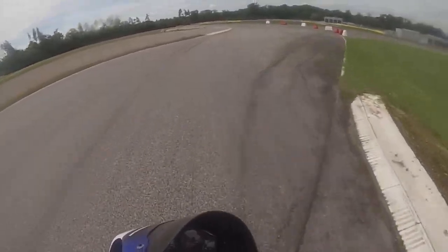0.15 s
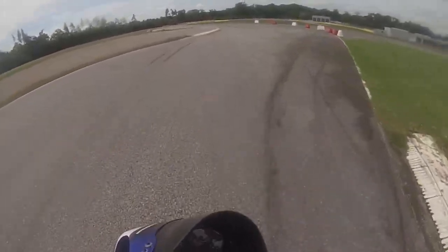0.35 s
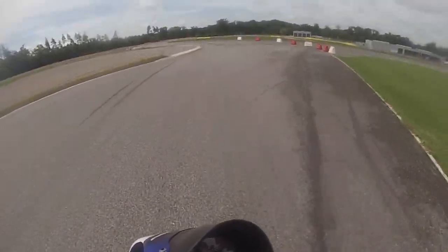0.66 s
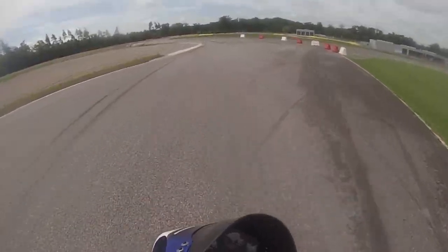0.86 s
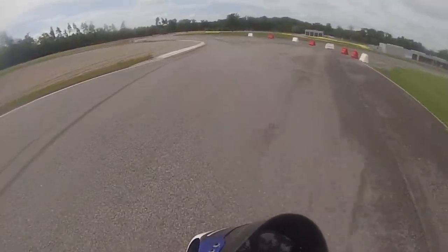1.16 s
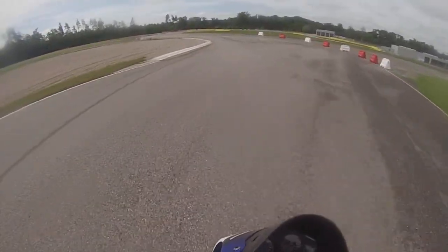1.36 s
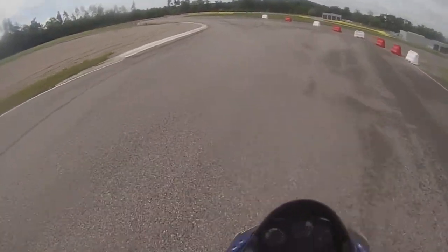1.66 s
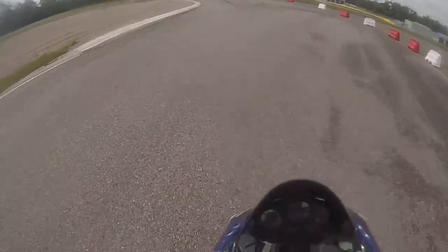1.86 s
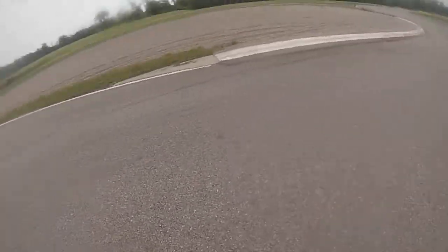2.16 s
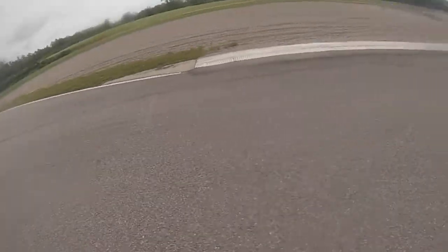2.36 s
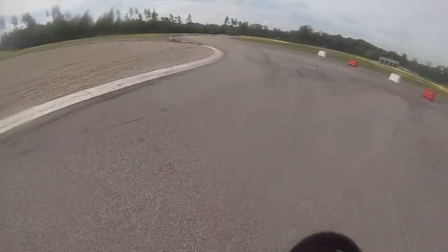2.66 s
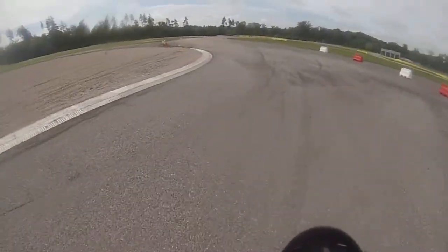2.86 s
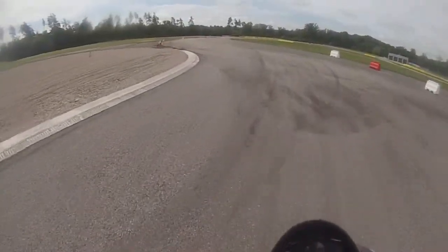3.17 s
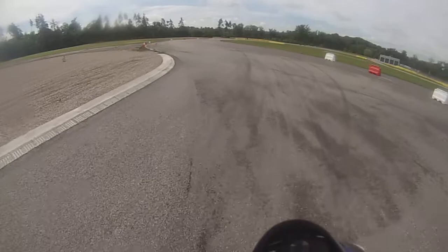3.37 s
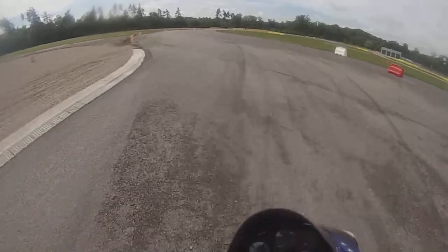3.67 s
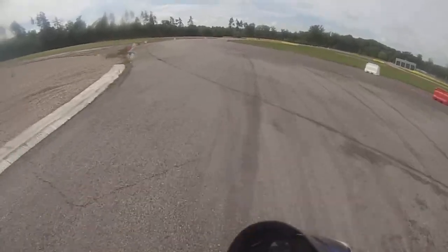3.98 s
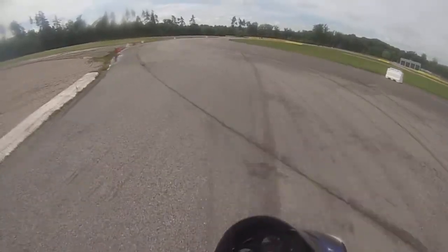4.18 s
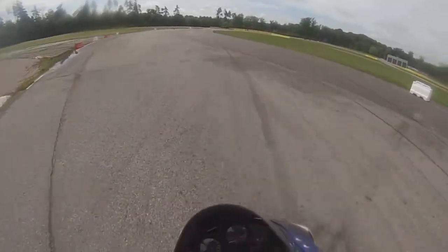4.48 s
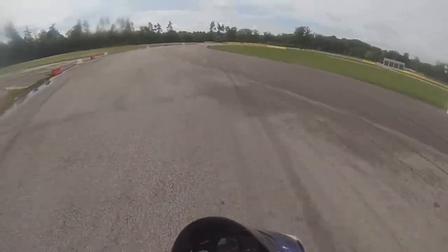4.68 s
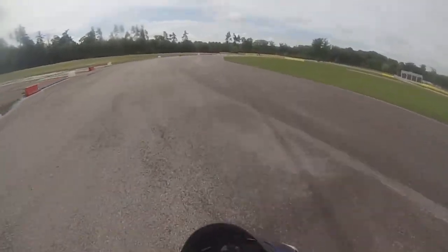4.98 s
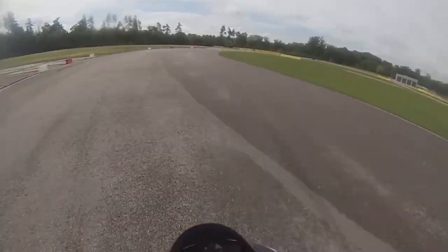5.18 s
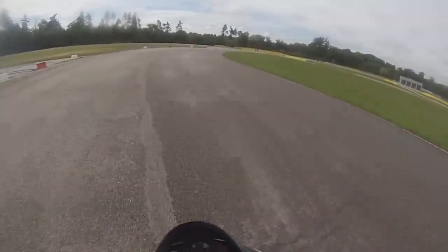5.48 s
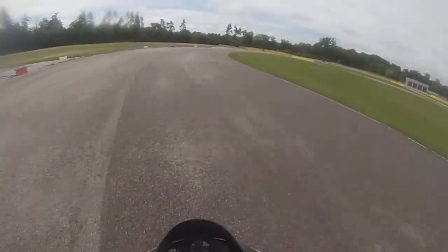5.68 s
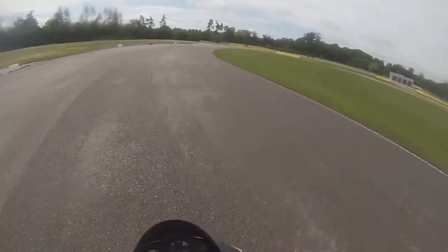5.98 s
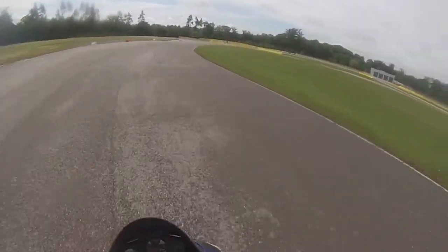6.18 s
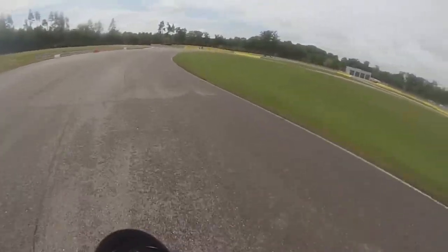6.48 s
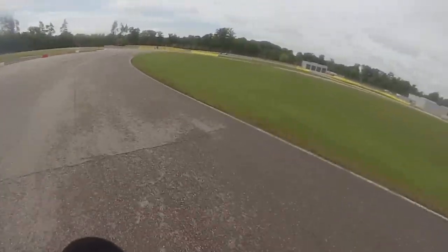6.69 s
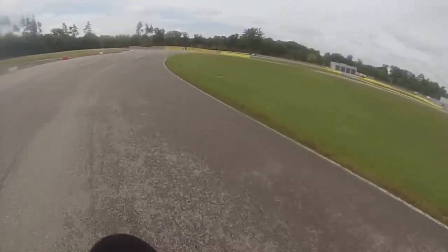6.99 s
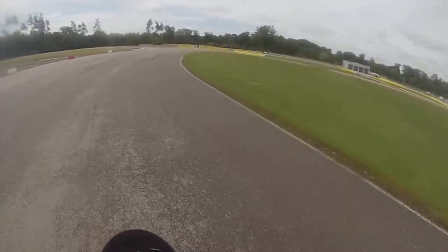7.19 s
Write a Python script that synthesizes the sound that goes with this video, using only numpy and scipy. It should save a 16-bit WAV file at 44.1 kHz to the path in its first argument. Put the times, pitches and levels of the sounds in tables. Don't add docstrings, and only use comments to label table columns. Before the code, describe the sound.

A microphone sealed in a camera case on a motorcycle rider's helmet catches mostly wind as the bike speeds round an open track. From 0 to 2 seconds there is a moderate hollow rush with fine hiss, soft low flutter and a faint blurred engine drone; the rush lifts a little near 1.6. Around 2.2 to 2.5 the rush drops back while heavy bass thumps hit the mount, and a very short falling swish passes at 2.5. From 3 seconds the wind builds, with irregular low knocks around 3.7 and 4.2, reaching its fullest roar near 5. The low, rough engine drone surges unevenly between about 4.5 and 6.6. After that the rush gradually eases, though deep buffeting stays strong. At about 6.8 a brief, breathy high whistle rises slightly and falls, and the wind continues to the end at 7.3.

```python
import sys
import numpy as np
from scipy import signal
from scipy.fft import rfft, irfft, next_fast_len
from scipy.io import wavfile
from scipy.ndimage import uniform_filter1d, map_coordinates

SR = 44100
rng = np.random.default_rng(int(sys.argv[2]) if len(sys.argv) > 2 else 0)


def makeup_ratio(level_db):
    decades = np.asarray(level_db, float) / 20
    return 10 ** decades


def wav_out(sig):
    wavfile.write(sys.argv[1], SR, np.round(np.clip(np.atleast_2d(sig).T, -1, 1) * 32767).astype(np.int16))


N = 323694
TIME_S = np.arange(N) / SR


def unit(x):
    return x / np.sqrt(np.mean(x ** 2) + 1e-20)


def curves(rows):
    times_s, *columns = np.transpose(rows)
    return [np.interp(TIME_S, times_s, column) for column in columns]


def wobble(rate):
    points = rng.standard_normal(int(N * rate / SR) + 4)
    return map_coordinates(points, [np.arange(N) * rate / SR])


def bump(centre_s, length_s):
    return np.exp(-3 * ((TIME_S - centre_s) / length_s) ** 2)


def slope(points):
    table_hz, db = np.transpose(points)
    return lambda hz: makeup_ratio(np.interp(np.log(hz + 1), np.log(table_hz), db, left=-120, right=-120))


def cavity(modes, steep):
    wall_hz = 7900

    def gain(hz):
        power = 0
        for centre_hz, width_hz, db in modes:
            detuning = (hz * hz - centre_hz * centre_hz) / (width_hz * hz + 1)
            power = power + makeup_ratio(2 * db) / (1 + detuning ** 2) ** steep
        return np.sqrt(power / (1 + (hz / wall_hz) ** 14))
    return gain


def turbulence(gain, patchy_db):
    cells = signal.stft(rng.standard_normal(N + 512), nperseg=512)[2]
    patches = uniform_filter1d(rng.standard_normal(cells.shape), size=8, axis=0)
    patches = unit(uniform_filter1d(patches, size=8, axis=1))
    noise = signal.istft(cells * makeup_ratio(patchy_db * patches), nperseg=512)[1][:N]
    size = next_fast_len(N + 8192)
    spectrum = rfft(noise, size) * gain(np.fft.rfftfreq(size, 1 / SR))
    return unit(irfft(spectrum, size)[:N])


def smeared_tone(hz, blur_rate, steady):
    phase = 2 * np.pi * np.cumsum(hz) / SR
    in_step = (steady + wobble(blur_rate)) * np.sin(phase)
    return unit(in_step + wobble(blur_rate) * np.cos(phase))


def evened(x, share):
    envelope = np.abs(signal.hilbert(x, next_fast_len(N))[:N])
    return unit(x / (envelope + 0.92) ** np.clip(share, 0, 1))


# start_s, airspeed as rush level_db,
# edge_db (hiss over rush, as the case edge turns into the stream), seal_db (fizz over rush, draught at the seal)
WIND = [(0, -33, -19.5, -34.5), (.9, -32, -19, -34.5), (1.36, -31, -17, -33), (1.62, -28.5, -16.5, -34),
        (1.92, -30, -21, -39), (2.18, -30.5, -21.5, -37), (2.25, -34.5, -16.5, -31.5),
        (2.49, -33.5, -16, -33), (2.68, -32, -15.5, -38), (3.26, -30, -16, -36), (3.33, -29, -17, -34.5),
        (4.0, -27.5, -17, -32), (4.25, -25, -17, -32), (5.05, -22.5, -14.5, -32), (5.75, -25, -15.5, -32.5),
        (6.4, -26.5, -18.5, -29.5), (6.9, -27.5, -16.5, -31.5), (7.34, -29.5, -20, -32)]
USUAL_DB = -29


def wind():
    rush_db, edge_db, seal_db = curves(WIND)
    return rush_db - USUAL_DB, edge_db, seal_db


# centre_s, level_db, rocking pitch_hz, length_s
KICKS = [(0.32, -28.5, 81.2, 0.11), (0.698, -28, 82.4, 0.25), (1.031, -27, 78, 0.13),
         (1.265, -33, 69.7, 0.092), (1.406, -33, 79.3, 0.073), (1.585, -30, 68, 0.28),
         (1.76, -24.5, 79.9, 0.067), (1.964, -23, 74, 0.048), (2.242, -21.5, 76.1, 0.24),
         (2.387, -16.5, 73, 0.073), (2.468, -15, 75.4, .11), (2.96, -21, 75.6, 0.14),
         (3.241, -25.5, 75, .15), (3.577, -23.5, 83.9, 0.18), (3.719, -17.5, 77.9, .06),
         (3.841, -21, 72, 0.052), (3.966, -23, 75.6, .16), (4.224, -18.5, 74.35, .2), (4.42, -23, 70.2, .1),
         (4.562, -21.5, 74.56, 0.074), (4.673, -20, 81.7, .05), (4.859, -21.5, 77, .22),
         (5.164, -25.5, 74.14, 0.42), (5.47, -19, 67, 0.061), (5.607, -21.5, 72.3, .16),
         (5.875, -18.5, 69.96, 0.16), (6.11, -24, 71.9, 0.11), (6.357, -22, 66.2, .36),
         (6.644, -18, 71.35, 0.22), (6.89, -17, 72.9, 0.15)]


def kicks():
    times_s, _, pitch_hz, _ = np.transpose(KICKS)
    strikes = sum(makeup_ratio(2 * db) * bump(at, long) ** 1.62 for at, db, _, long in KICKS)
    tremble = makeup_ratio(2 * (-31.5 + 0.45 * wind()[0]))
    return 10 * np.log10(strikes + tremble), np.interp(TIME_S, times_s, pitch_hz)


# start_s, sway_db (large eddies round the helmet), rim_db (smaller ones shed from its rim)
EDDIES = [(0, -37, -37), (.6, -35.5, -35), (1.2, -35.5, -39), (1.64, -33, -34), (1.98, -36, -35.5),
          (2.12, -28, -32.5), (2.5, -30.5, -32.5), (2.78, -36, -36), (3.04, -29, -33.5), (3.8, -28.5, -34),
          (4.2, -34, -33), (4.6, -29.5, -28), (5.25, -29.5, -33.5), (5.78, -30, -30.5), (6.15, -33, -32),
          (6.36, -28, -33), (6.85, -28, -32.5), (7.34, -29, -33.5)]
# pitch_hz, level_db (per Hz)
SWAY = [(10, -30), (18, -5), (28, -3), (40, -1), (52, 0), (64, -8), (100, -40)]
THUMP = [(35, -30), (52, -9), (64, -3), (74, 0), (86, -1), (95, -3), (105, -14), (130, -24), (200, -50)]
SHUDDER = [(70, -33), (105, 0.5), (135, 3), (160, -2.5), (220, -4.5), (300, -9.5), (400, -21.5), (700, -52)]


def buffeting():
    sway_db, rim_db = curves(EDDIES)
    thump_db, rocking_hz = kicks()
    shudder_db = rim_db + 0.039 * (thump_db - thump_db.mean()) + 0.51 * wobble(9)
    flutter_db = 2.4 * wobble(24)

    sway = makeup_ratio(sway_db + 1.1) * evened(turbulence(slope(SWAY), patchy_db=-1.0), share=0.94)
    swing = smeared_tone(rocking_hz, blur_rate=9, steady=5.6)
    mount = turbulence(slope(THUMP), patchy_db=0.1) + 0.85 * swing
    thump = makeup_ratio(thump_db - 0.83 + flutter_db) * evened(mount, share=0.67)
    shaking = evened(turbulence(slope(SHUDDER), patchy_db=0.05), share=0.092)
    return sway + thump + makeup_ratio(shudder_db + 0.4) * shaking


# centre_s, depth_db, length_s
LULLS = [
    (2.036, 2, .05),
    (2.483, 6, .04),
    (3.11, 1, .06),
    (3.93, 3, 0.056),
    (6.215, 2, .03),
    (6.75, 1.5, 0.084),
    (.69, -1, .06),
    (6.042, -1, 0.12),
]
# pitch_hz, level_db (per Hz)
ROAR = [(200, -42), (300, 2.5), (400, 0), (550, -2.5), (800, -1), (900, -8), (1100, -13), (2000, -52)]
FIZZ = [(6500, -30), (8000, -3), (8600, -1), (9500, 0), (10400, -5), (11200, -5), (12000, -7), (12800, -15),
        (13600, -14), (14200, -21), (15200, -29), (16000, -70)]
# pitch_hz, width_hz, level_db
RUSH_MODES = [(1126, 180, -4.5), (1339, 150, -2), (1425, 112, 0), (1562, 260, -5), (1860, 370, -5.5),
              (2103, 250, -3.5), (2336, 280, -6.5), (2870, 690, -15.5), (3750, 500, -16.5)]
HISS_MODES = [(5015, 580, 2), (5660, 370, 0.5), (6210, 300, -4), (6800, 430, -5.5), (7630, 280, -4.5)]


def airstream():
    speed_db, edge_db, seal_db = wind()
    lull_db = -sum(depth_db * bump(at, long) for at, depth_db, long in LULLS)
    gust = wobble(16) + 0.94 * wobble(45)

    roar_db = -40.5 + 0.78 * speed_db + 0.34 * (seal_db - seal_db.mean()) + 0.43 * lull_db
    rush_db = USUAL_DB + speed_db + 0.42 * lull_db
    hiss_db = USUAL_DB + speed_db + edge_db + 0.61 * lull_db
    fizz_db = USUAL_DB + 2.5 + speed_db + seal_db + 1.2 * lull_db

    roar = makeup_ratio(roar_db - 0.03) * turbulence(slope(ROAR), patchy_db=0.24)
    rush = makeup_ratio(rush_db + 0.31 + 0.21 * gust) * turbulence(cavity(RUSH_MODES, steep=1.387), patchy_db=0.72)
    hiss = makeup_ratio(hiss_db - 0.16 + 0.21 * gust) * turbulence(cavity(HISS_MODES, steep=1.25), patchy_db=0.6)
    fizz = makeup_ratio(fizz_db - 2.0 + 0.66 * gust) * turbulence(slope(FIZZ), patchy_db=0.9)
    return roar + rush + hiss + fizz


# start_s, level_db
ENGINE = [(0.0, -42), (0.18, -45.5), (3.8, -40), (4.29, -43.5), (4.35, -40), (4.46, -69), (4.5, -35),
          (4.62, -42.5), (5.25, -35), (5.29, -45), (5.36, -31.5), (5.93, -44), (6.09, -28.5), (6.15, -41.5),
          (6.36, -33), (6.54, -45), (6.58, -33), (7.34, -41)]
FIRING_HZ, FIRING_RISE_HZ_PER_S, FIRING_WANDER_HZ = 275, 0.4, 8


def engine():
    level_db, = curves(ENGINE)
    firing_hz = FIRING_HZ + FIRING_RISE_HZ_PER_S * TIME_S + FIRING_WANDER_HZ * wobble(4)
    drone = smeared_tone(firing_hz, blur_rate=56, steady=0)
    crank = smeared_tone(firing_hz / 2, blur_rate=18, steady=0.19)
    return makeup_ratio(level_db - 0.5) * drone + makeup_ratio(level_db - 7.0) * crank


# start_s, pitch_hz, level_db
SWISH = [
    (2.5, 1200, -54),
    (2.53, 1120, -41.5),
    (2.575, 1010, -40),
    (2.62, 930, -54),
]


def swish():
    pitch_hz, level_db = curves(SWISH)
    tone = makeup_ratio(level_db) * smeared_tone(pitch_hz, blur_rate=60, steady=1.5)
    return tone * (TIME_S > SWISH[0][0]) * (TIME_S < SWISH[-1][0])


WHISTLE_S, WHISTLE_LENGTH_S, HALO_LENGTH_S = 6.805, 0.16, 0.26
WHISTLE_HZ, WHISTLE_ARCH_HZ = 3600, 320
TONE_DB, HALO_DB = -36, -39


def whistle():
    catch = bump(WHISTLE_S, WHISTLE_LENGTH_S)
    pitch_hz = WHISTLE_HZ + WHISTLE_ARCH_HZ * catch
    tone = makeup_ratio(TONE_DB) * catch ** 1.8 * smeared_tone(pitch_hz, blur_rate=160, steady=1.6)
    breath = smeared_tone((pitch_hz + 3760) / 2, blur_rate=420, steady=0)
    return tone + makeup_ratio(HALO_DB) * bump(WHISTLE_S, HALO_LENGTH_S) * breath


def scene():
    return (buffeting() + airstream() + engine() + swish() + whistle())[None]


def thinned(x, edge_hz, under_db, follow):
    hz, _, cells = signal.stft(x, SR, nperseg=1024)
    power = uniform_filter1d(np.abs(cells) ** 2, size=4, axis=1)
    fizz = power[:, (hz > 8000) & (hz < 12000)].mean(axis=1, keepdims=True)
    usual = np.exp(np.log(fizz).mean())
    bar = usual * (fizz / usual) ** follow * makeup_ratio(2 * under_db)
    weak = (power < bar) & (hz[:, None] > edge_hz)
    return signal.istft(cells * ~weak, SR, nperseg=1024)[1][:, :N]


def band_limit(x):
    return signal.sosfilt(signal.butter(12, 15150, fs=SR, output="sos"), x)


# pitch_hz, level_db (per Hz)
SELF_NOISE = [(9000, -20), (12500, -1), (15300, 0), (16000, -30)]


def record(dry):
    heard = dry + makeup_ratio(-80.5) * turbulence(slope(SELF_NOISE), patchy_db=1)
    mix = thinned(heard, edge_hz=12800, under_db=-16.5, follow=0.5)
    return band_limit(mix)


dry = scene()
out = record(dry)
wav_out(out)
```